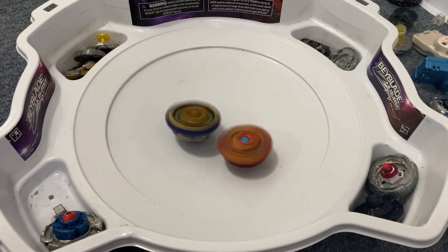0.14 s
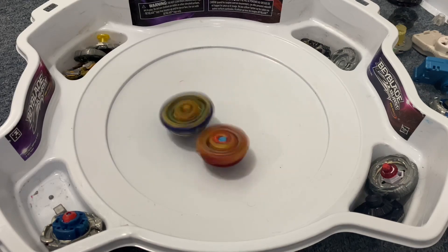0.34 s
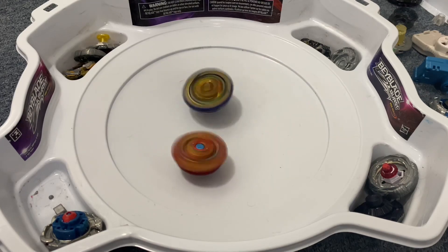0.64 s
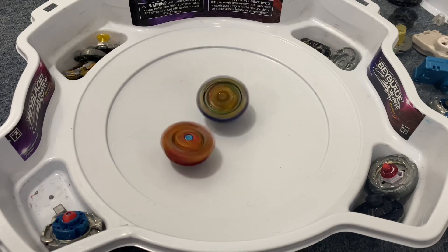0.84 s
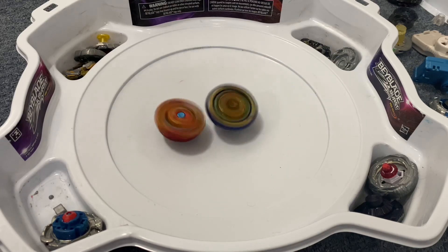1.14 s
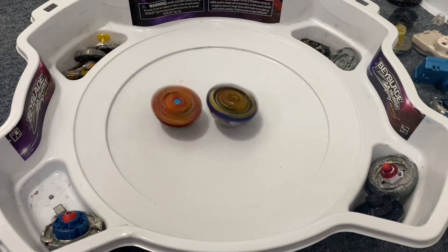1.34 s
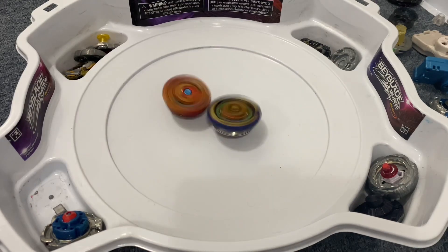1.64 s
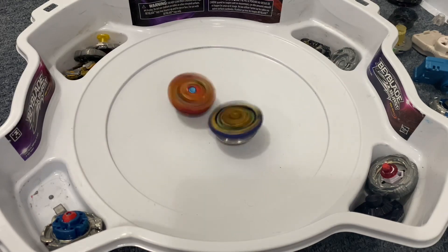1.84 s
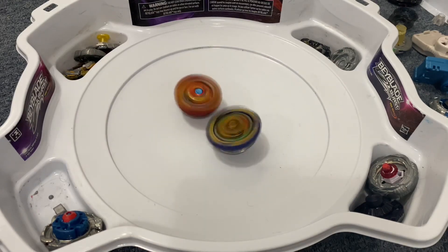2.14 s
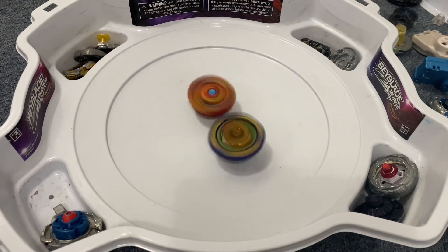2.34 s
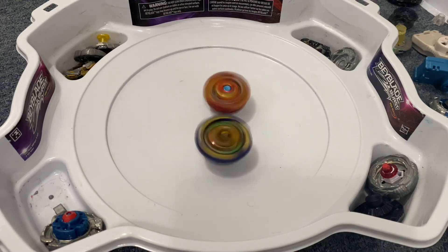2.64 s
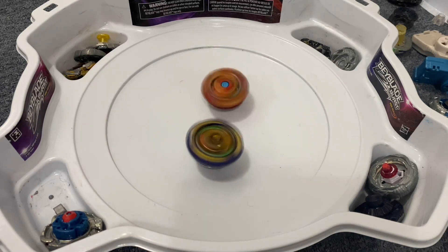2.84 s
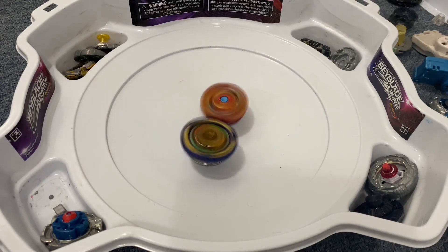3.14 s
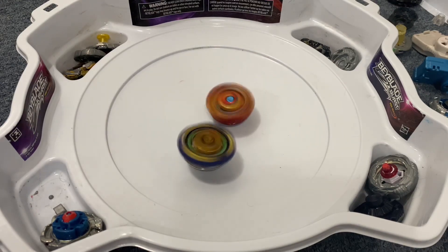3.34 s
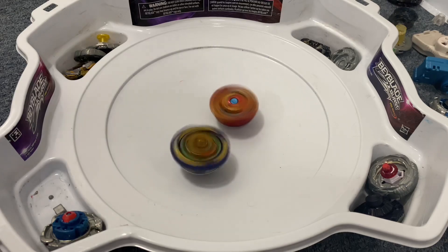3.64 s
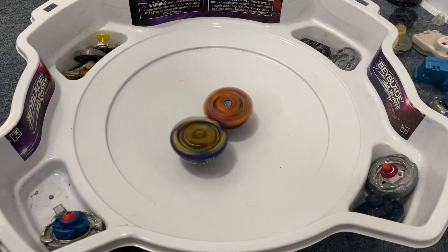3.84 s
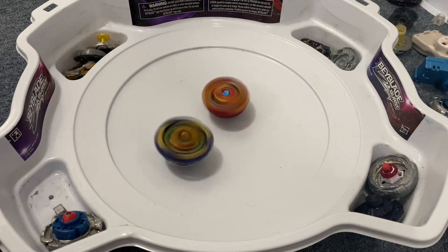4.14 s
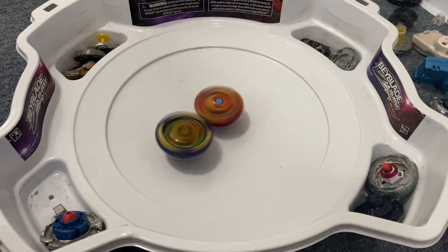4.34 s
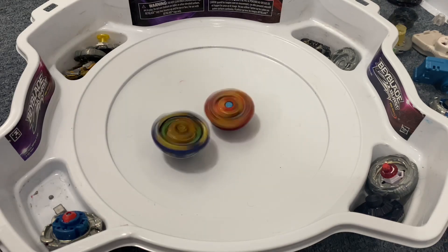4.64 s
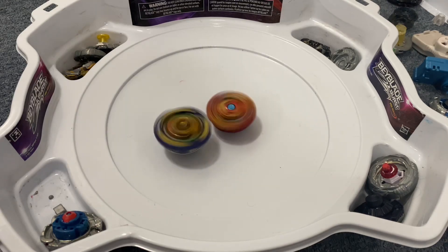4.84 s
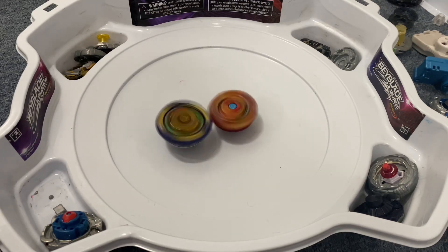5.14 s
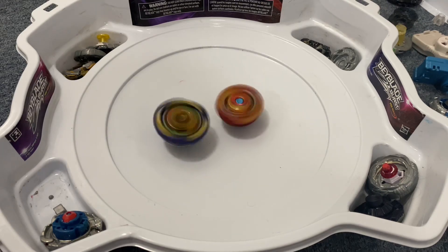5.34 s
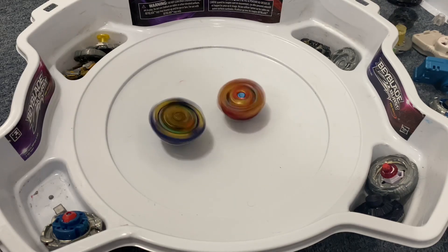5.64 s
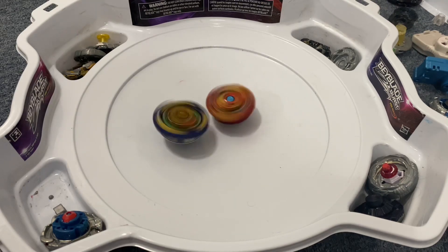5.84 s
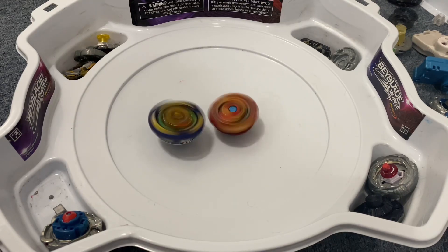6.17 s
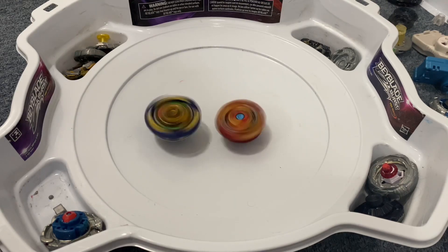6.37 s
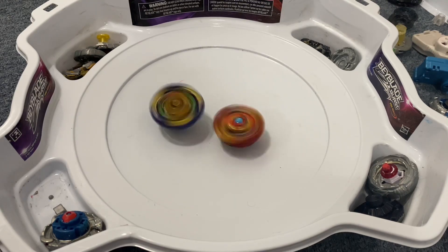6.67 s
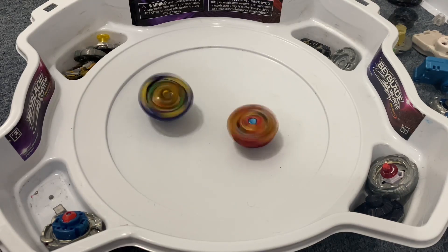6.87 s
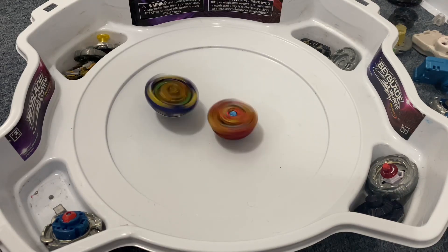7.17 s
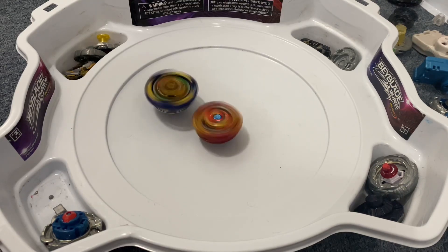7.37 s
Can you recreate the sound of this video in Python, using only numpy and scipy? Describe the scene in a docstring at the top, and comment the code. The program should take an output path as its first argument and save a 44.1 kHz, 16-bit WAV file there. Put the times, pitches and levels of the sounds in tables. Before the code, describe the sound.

Two spinning tops are already circling in a thin plastic bowl, heard close in stereo in a small room. A soft low rumble of the bowl continues throughout, with gritty, pulsing tip scrape clearest in the first 1.5 seconds, then fading. A tight triple clack lands at 0.2 s and a harder one at 0.4, then fast loose ticking, about 36 a second, purrs until 1.25. A clustered crack follows at 1.3, with more at 1.65, 1.9, 2.1, 2.3 and 2.65. Spaced hits come around 3.1, 3.2, 3.6, 3.9, 4.35, 4.45, 4.85, 5.0, 5.2, 5.5, 5.9, 6.3, 6.7 and 7.3. Each is a bright, toothy snap with a hollow plastic knock, thin wavering metallic ring and short rattly echo. Light grazes click between them; ticking returns briefly near 4.7, 5.8 and 6.1, then from 6.9 to 7.3, slightly slower. It ends at 7.5, still spinning.

```python
"""Two spinning tops in a bowl

Two tops circle in a thin plastic bowl and knock rims. Each knock is a burst of teeth on teeth that shakes the
bowl and rings a metal weight ring, whose tones the spin splits in two, along with plastic rims. The tips scrape
as filtered grit, a loose part ticks once a turn, the bowl drums softly as low filtered noise. Two channels
carry it all in a small room, whose echo is noise that dies band by band."""
import sys
import numpy as np
from scipy import signal
from scipy.fft import rfft, irfft, next_fast_len
from scipy.io import wavfile

SR = 44100
rng = np.random.default_rng(int(sys.argv[2]) if len(sys.argv) > 2 else 0)


def wav_record(signal):
    """Record a signal, one row per channel, as 16-bit PCM in the file named by sys.argv[1]."""
    frames = np.transpose(np.atleast_2d(signal))
    bounded = np.clip(frames, -1, 1)
    # unit amplitude maps onto the largest positive 16-bit level
    quanta = np.round(bounded * 32767).astype(np.int16)
    wavfile.write(sys.argv[1], SR, quanta)


N = 331191
T = np.arange(N) / SR

# Rotation of the slowing top: (time [s], turns so far [turns])
TURNS = [(0, .5), (.5308, 20), (.8077, 30), (1.085, 40), (1.2282, 45), (1.552, 56), (1.849, 66),
         (4.5601, 144), (4.7871, 150), (5.709, 174), (5.8707, 178), (6.1336, 184), (6.266, 187),
         (6.9437, 202), (7.2785, 209), (7.52, 214)]
# Tips on the bowl: (time [s], scrape level [dB], drumming level [dB])
TIPS = [(0.0, -51, -41.5), (0.35, -48, -41.5), (0.72, -47.5, -44), (0.85, -51.5, -48), (1.05, -57.5, -47),
        (1.27, -54, -42), (1.4, -49, -46.5), (1.5, -47, -45), (1.84, -60, -47), (2.15, -54.5, -44),
        (2.45, -57.5, -44), (2.84, -56, -46.5), (3.57, -59, -44.5), (3.93, -59.5, -46), (4.85, -63.5, -44),
        (5.04, -71.5, -45), (5.6, -61, -44.5), (6.19, -59, -42), (6.59, -66.5, -43), (6.76, -53, -40.5),
        (6.92, -60.5, -43.5), (7.51, -60, -41.5)]
# Relative spectrum of the scraping grit: (frequency [Hz], level [dB per Hz])
SCRAPE_SPECTRUM = [(180, -16.5), (300, -9), (504, -12.5), (638, -4.5), (877, -1), (1740, -5), (1960, -6.5),
                   (3030, -3.5), (3470, -8), (4390, -6), (7380, -12), (9980, -10), (12200, -18),
                   (14000, -16.5), (16500, -37.5)]
# Relative spectrum of the drumming bowl: (frequency [Hz], level [dB per Hz])
DRUM_SPECTRUM = [(12, -62), (20, -42.5), (32, -30.5), (72, -2), (90, 5.5), (134, -4.5), (173, -8.5),
                 (334, -27.5), (372, -29), (414, -43), (500, -34), (650, -76.5), (1100, -120)]
# Modes of the thin plastic bowl: (frequency [Hz], level [dB], t60 [s])
BOWL_MODES = [(156.1, -4.5, 0.36), (257, -6.5, 0.098), (754, 4.5, 0.041), (882, 3, 0.095),
              (940, 6.5, 0.029), (1160, 7, 0.048), (1360, -2.5, 0.039), (1483, 6.5, 0.021),
              (1855, 2, 0.031), (2010, 8, 0.013), (2350, -8, 0.025), (2920, -29.5, 0.022)]
# Spells in which the loose part rattles: (start [s], end [s], tick level [dB], rebound [dB re tick],
# rebound delay [turns], shell ring [dB re tick], jolt in the bowl [dB re tick], snap [dB re tick])
RATTLES = [(0.0, 0.5, -72, -16, 0.47, -9, -14, 6), (0.55, 0.68, -43.5, -6, 0.33, -14, -27, -1),
           (0.695, 1.266, -46, -23, 0.62, 6.5, -13, -2.5), (1.54, 1.618, -46, -10, 0.63, 8.5, -24, 8),
           (1.805, 1.855, -47, -7, 0.61, 9, -19, -4), (4.565, 4.846, -43, -15, 0.37, -16, -17.5, 1.5),
           (5.633, 5.914, -46, -0.5, 0.36, -19.5, -13.5, -10.5),
           (6.09, 6.2, -45, -2.5, 0.22, -16, -11.5, -2.5), (6.248, 6.27, -44, -6, 0.77, -9, -12, -1),
           (6.89, 7.317, -40, -16, 0.39, -22, -17, -6)]
# The loose part between spells: (tick level [dB], rebound [dB re tick], rebound delay [turns],
# shell ring [dB re tick], jolt in the bowl [dB re tick], snap [dB re tick])
IDLE_TICK = (-77.5, 5, 0, 4.5, -16, 5.5)
# Relative spectrum of the slap: (frequency [Hz], level [dB per Hz])
SLAP_SPECTRUM = [(500, -26), (1000, -16.5), (2500, -28), (3800, 16), (4300, 10), (4900, 2.5), (5700, -2),
                 (6600, 14), (8000, 19), (12000, 9.5), (15000, 1.5), (16500, -26.5)]
# Light grazes of the rims that ring the shell: (time [s], level [dB], slap [dB re level],
# jolt in the bowl [dB re level])
GRAZES = [(0.124, -43, -15, -7), (0.15, -43, -17, -8), (0.1748, -36.5, -14, -12), (0.204, -43, -18, -23),
          (0.313, -44, -16, -6), (0.341, -37.5, -12, -3), (0.367, -28, -11, -17), (0.479, -36, 0, -24),
          (0.531, -43, 3.5, -21), (0.699, -43, 7, -17), (1.453, -37, -4, -13.5), (1.485, -35, 0.5, -10.5),
          (1.516, -34, 0.5, -13), (2.0448, -40.5, -21, -26), (2.0794, -37, -18, -31),
          (2.1695, -25, -11, -28), (2.198, -38, -11, -25), (2.9679, -38, -7, -18), (3.0365, -53, -14, -11),
          (3.749, -42.5, -12, -16), (4.0039, -34.5, -10, -26), (4.095, -43.5, -21, -11.5),
          (4.231, -55, 1, -14), (4.271, -44, -4, -32), (6.208, -45, 4, -7.5), (6.85, -49, 4, -5),
          (7.4, -32.5, -3, -14)]
# Modes of a top's plastic shell, before dulling: (frequency [Hz], level [dB], t60 [s])
SHELL_MODES = [(1400, -9, .014), (1750, -9, .012), (2100, -8, .012), (2550, -4, .016), (2800, -6, .012),
               (3020, -3, .016)]
# Hub that a tick's jolt rings: (frequency [Hz], level [dB re jolt], t60 [s])
HUB = (1100, 7.5, 0.034)
# Knocks: (time [s], level [dB], rake of the teeth [ms], echo [dB re level], bowl thump [dB re level],
# ring tones near 4, 9.5 and 10.2 kHz [dB re level, three columns],
# low body tone [Hz], its level [dB re level], high body tone [Hz], its level [dB re level],
# skid [dB re level])
KNOCKS = [(0.2167, -11, 2.6, -10, -16.5, -39, -42, -23, 1118, -19, 1510, -23, -33.5),
          (0.2238, -18, 4, -12, -19, -36, -42, -30, 1110, -22, 1900, -28, -40),
          (0.2367, -11.5, 3.4, -12.5, -21, -38, -46, -31, 1290, -24, 2160, -16, -37),
          (0.38, -6, 3.8, -9, -18, -32.5, -25, -19.5, 872, -24, 2540, -16, -33.5),
          (1.262, -31.5, 2.4, -10, -2.5, -14, -13.5, -28, 840, -13, 1440, -20, -22),
          (1.3267, -12.5, 2.8, -11, -16.5, -33, -29, -21, 1029, -12, 2650, -12, -38),
          (1.3401, -24, 5.5, -2.5, -5, -29, -22, -24, 960, -31, 1740, -20, -34),
          (1.3544, -7, 3.8, -16.5, -29, -34, -25, -22, 710, -21.5, 1900, -34, -54),
          (1.638, -21, 3.4, -14, -28, -37, -41, -28, 1384, -15, 2300, -10, -43),
          (1.696, -14, 3.6, -16.5, -29, -33.5, -47, -27, 1360.0, -23, 2210, -20, -50),
          (1.8643, -6.5, 3.8, -15.5, -25, -20.5, -18.5, -10, 892, -35, 1840, -16, -47),
          (2.1034, -22, 2.5, -16, -22, -40, -40, -34, 960, -28, 1890, -10, -42),
          (2.1084, -6.5, 1.9, -16, -28, -37, -34.5, -20.5, 980, -38, 1926, -14.5, -44.5),
          (2.2692, -11, 2.2, -16.5, -20.5, -33, -47, -36, 986, -11.5, 1800, -13.5, -39),
          (2.3328, -26, 2.6, -10, -7, -40, -38, -42, 795, -29, 1500, -1, -45),
          (2.3411, -8.5, 3.5, -11, -19, -32, -29.5, -29, 957, -12, 2130, -12, -40),
          (2.652, -9, 3.6, -9, -16, -26, -26, -20, 1095, -12.5, 2620.0, -26, -34.5),
          (3.0989, -17, 4.1, -11, -18.5, -41, -44, -25.5, 860, -38, 1925, -9.5, -59),
          (3.1098, -25.5, 5, -17, -15, -38, -40, -30, 1130, -16, 1970, -1, -52),
          (3.2014, -13, 3.4, -12, -19, -44, -29, -23.5, 1270, -18, 1925, -10, -38),
          (3.5921, -8, 5.1, -14, -19.5, -38, -37, -15, 1300, -21, 1520, -14.5, -51),
          (3.8976, -6, 4.4, -11, -20, -28.5, -30, -17, 1260, -12.5, 2080.0, -35.5, -38),
          (4.3387, -14, 3.9, -10.5, -15.5, -44, -32, -32, 1030.0, -22, 1410, -11.5, -40),
          (4.4316, -11, 4.5, -12.5, -20.5, -51, -41, -25, 874, -12, 1693, -12, -49),
          (4.8435, -13.5, 4.1, -14, -20.5, -38.5, -31, -18.5, 1175, -26, 1400, -15, -36.5),
          (4.9685, -26.5, 6.4, -8.5, -9.5, -44, -39, -37, 1050, -16, 1446, -6, -38),
          (5.0299, -8.5, 4, -18.5, -25.5, -39, -46.5, -19, 1170, -23.5, 2170, -30, -54),
          (5.188, -27, 3.3, -9.5, -14, -28, -34, -32, 1348, -10, 1650, -5, -33),
          (5.2106, -6.5, 3.8, -15, -24, -41, -45, -24, 1150, -25, 1960.0, -18, -41),
          (5.5162, -5, 4.7, -13, -21, -39.5, -23, -21, 1186, -16.5, 1496, -16.5, -41),
          (5.9095, -31, 5.4, -9, -0.5, -29.5, -22, -24, 1490, -5, 2640.0, -2, -35),
          (5.918, -6, 6.8, -13, -18, -32.5, -19, -6, 1304, -18, 2450, -40, -39),
          (6.2796, -5.5, 4.3, -15, -23.5, -44, -34.5, -23.5, 989, -25, 1510, -22, -40.5),
          (6.6964, -7, 6, -9.5, -23, -25.5, -11, -10.5, 930, -22.5, 2450.0, -21, -34),
          (7.3272, -9.5, 5.9, -10.5, -24, -41, -29, -25, 680, -29, 2140, -18, -34)]
# Relative spectrum of teeth on teeth: (frequency [Hz], level [dB per Hz])
CRACK_SPECTRUM = [(240, -32.5), (400, -32), (2400, -2), (3070, 8), (5550, -9.5), (7940, 0), (10000, 3),
                  (11400, 4), (14100, -4.5), (15300, -5.5), (16500, -36.5)]
# Modes of the metal weight ring: (frequency [Hz], level [dB], t60 [s], waves round the ring [count],
# group of tones [0-2], lean to the upper split tone [-1 to 1])
METAL_MODES = [(3945, 1, .28, 1, 0, .3), (3915, 1, .3, 0, 0, 0), (4010, 1, .14, 1, 0, -.3),
               (3720, -8, .14, 1, 0, .3), (3040, -3, .15, 1, 0, .3), (4990, -8, .12, 1, 0, .3),
               (9520, 0, .31, 3, 1, -.45), (9520, -15, .26, 0, 1, 0), (10165, 0, .18, 3, 2, .2),
               (10250, -8, .17, 0, 2, 0), (9990, -12, .15, 1, 2, .3), (6500, -24, .14, 1, 2, .3),
               (8700, -14, .1, 2, 2, .3), (13500, -14, .09, 2, 2, .3)]
# Modes of the plastic rims: (frequency [Hz], level [dB], t60 [s])
RIM_MODES = [(1690, -5, .09), (2090, -3, .09), (2620, -4, .1), (3140, -4, .1), (3480, -3, .09),
             (4400, -4, .09), (5050, -4, .09), (5670, -6, .08), (6250, -6, .07), (6760, -5, .08),
             (7860, -13, .05)]
# Relative spectrum of the echo: (frequency [Hz], level [dB per Hz])
ECHO_SPECTRUM = [(200, 3), (500, -16.5), (900, 1), (1500, 1.5), (3000, -3.5), (6000, -2.5), (10000, -1),
                 (13000, -14.5), (16500, -8)]
# Decay of the room's late tail: (frequency [Hz], t60 [s])
ROOM_T60 = [(200, 0.31), (530, 0.33), (1400, 0.24), (3700, 0.31), (9700, 0.19), (15000, 0.011)]
# Colour of the channels: (frequency [Hz], left minus right [dB])
LEFT_BIAS = [(100, -.5), (300, 0), (800, 4), (1500, 1.5), (2750, 0), (3600, 3.5), (4500, 1), (5500, 2.5),
             (8500, 1.5), (10000, -.8), (16000, -.5)]

# The scrape is duller as the spin runs down; its hiss swings less than its body
SCRAPE_BRIGHT_DB, SCRAPE_DULLS_DB_PER_S, BRIGHT_PER_SCRAPE_DB = -6, 0.5, -0.34
REFERENCE_SCRAPE_DB = -55
# The tip digs in once a turn and eases off; less so as the top settles
THROB_EXTRA_DB, THROB_LATE_DB, THROB_FADE_S = 11, 7, 1.2
DRUM_BRIGHT_DB, DRUM_BRIGHT_PER_SCRAPE_DB = 3.5, 0.85  # a hard scrape drums higher
RATTLE_SWELL_S, RATTLE_FADE_S = 0.053, 0.043  # a spell swells before its start and dies after its end
GRAZE_SHELL_DB = -4.5  # re graze level
SHELL_RUB_S, SHELL_TOP_HZ = .0012, 3400  # a touch is a short rub; the shell sends out little above
# Per octave: the ring sinks as the top leans, from 1 s to SHELL_DULLEST_S; its tones waver by chance
SHELL_DULLS_DB_PER_S, SHELL_DULLEST_S, SHELL_CHANCE_DB = 6, 2.1, 1.5
SNAP_HZ = (3600, 6400)  # part of the slap that sounds in both channels at once
BODY_LOW_T60_S, BODY_HIGH_T60_S = .055, .04
SKID_PER_S, SKID_FADE_S, SKID_IN_BOWL_DB = 220, 0.037, -15.5  # the tip hops after a knock
RING_ROUGH_DB = 2.5  # loose fit makes the low ring tones waver
RIM_DB, RIM_CHANCE_DB = -19, 6  # re echo; each knock favours other tones
# The first echoes die sooner (share of the room's t60), a weaker tail lingers
EARLY_SHARE, LATE_DB = 0.55, -8
BASS_LAG, TREBLE_LEAD, SPLIT_HZ = 6.5, 11.06, 6500  # right channel against left, in samples


def from_db(db):
    """Logarithmic level: 20 dB is a factor of ten in amplitude."""
    return np.exp(np.asarray(db) * (np.log(10) / 20))


def rms_one(x):
    """Normalisation: equal mean power, rms 1."""
    return x / np.sqrt(np.mean(x ** 2) + 1e-20)


def in_time(rows):
    """Linear interpolation: the columns of a time table at every sample."""
    s, *columns = np.transpose(rows)
    return [np.interp(T, s, c) for c in columns]


def at_hz(points, hz):
    """Logarithmic pitch: a spectrum table is read on a log frequency axis."""
    points_hz, values = np.array(points).T
    return np.interp(np.log(hz + 1), np.log(points_hz), values)


def filtered(x, order, hz, kind):
    """Butterworth filtering: a maximally flat passband, applied causally."""
    return signal.sosfilt(signal.butter(order, hz, kind, fs=SR, output="sos"), x)


def colour(x, spectrum):
    """Minimum phase: folding the cepstrum makes a causal filter of the given spectrum, with unit energy."""
    size = 2 ** 14
    cepstrum = irfft(np.log(from_db(at_hz(spectrum, np.fft.rfftfreq(size, 1 / SR)))))
    cepstrum[1:size // 2] *= 2
    cepstrum[size // 2 + 1:] = 0
    response = irfft(np.exp(rfft(cepstrum)))[:size // 2]
    return signal.fftconvolve(x, response / np.linalg.norm(response))[:N]


def drift(rate):
    """Slow random modulation: independent normal values, 2 * rate a second, joined by straight lines."""
    steps = T * rate * 2
    count = int(steps[-1]) + 2
    return np.interp(steps, np.arange(count), rng.standard_normal(count))


def ring(clicks, hz, t60):
    """Damped resonance: a unit click sets a decaying sine of initial height 1 ringing."""
    r, w = from_db(-60 / (t60 * SR)), 2 * np.pi * hz / SR
    return signal.lfilter([0, np.sin(w)], [1, -2 * r * np.cos(w), r * r], clicks + 1e-18)


def smear(x, fade_s, gain=1):
    """Exponential relaxation: each click becomes a decaying envelope."""
    return signal.lfilter([gain], [1, -np.exp(-1 / (fade_s * SR))], x)


def bowl(force):
    """Modal superposition: the thin plastic bowl rings in its modes, of alternating sign."""
    return sum((-1) ** k * from_db(db) * ring(force, hz, t60) for k, (hz, db, t60) in enumerate(BOWL_MODES))


def scrape(turns, level_db, bright_db, bowl_db):
    """Friction noise: dense grit under a tip throbs with each turn, heard directly and through the bowl."""
    grit = rng.standard_normal(N) * from_db(2.8 * np.minimum(rng.exponential(1, N), 5))
    throb_db = THROB_LATE_DB + THROB_EXTRA_DB * np.exp(-T / THROB_FADE_S)
    grit = grit * from_db(throb_db * (.5 - turns % 1) + 2.8 * drift(55) + 2.5 * drift(5.6))
    above_boom = filtered(bowl(grit), 2, 600, "high")
    direct = rms_one(colour(grit, SCRAPE_SPECTRUM))
    both = rms_one(direct + from_db(bowl_db) * rms_one(above_boom))
    high = filtered(both, 2, 2000, "high")
    return from_db(level_db) * (both + (from_db(bright_db) - 1) * high)


def drumming(level_db, bright_db, apart_db):
    """Forced vibration: the bowl drums on the floor as low noise, nearly alike in both channels."""
    mid, side = (rms_one(colour(rng.standard_normal(N) * from_db(0.84 * drift(10.0)), DRUM_SPECTRUM))
                 for _ in range(2))
    both = mid + from_db(apart_db) * side * [[1], [-1]]
    high = filtered(both, 3, 125, "high")
    return from_db(level_db) * (both - high + from_db(bright_db) * high)


def rattle_controls():
    """Linear cross-fading: the six tick settings glide from idle to each spell's values and back."""
    idle, change = np.array(IDLE_TICK)[:, None], 0
    shares = [np.interp(T, [start - RATTLE_SWELL_S, start, end, end + RATTLE_FADE_S], [0, 1, 1, 0])
              for start, end, *_ in RATTLES]
    for share, (_, _, *values) in zip(shares, RATTLES):
        change = change + share * (np.array(values)[:, None] - idle)
    return idle + change / np.maximum(sum(shares), 1)


def loose_part_hits(turns, rebound_db, late):
    """Periodic impact: the loose part hits once a turn and rebounds; strengths relative to the main tick."""
    hits = np.zeros(N)
    rebound_phase = turns - late + 0.067 * drift(8.4)
    for level_db, phase in (0, turns), (rebound_db, rebound_phase):
        new_turn = np.diff(np.floor(phase), prepend=0) > 0
        hits += new_turn * from_db(level_db + 1.5 * rng.standard_normal(N))
    return hits


def shell_ring(touches):
    """Modal resonance: short rubs and clicks ring the plastic shell, which dulls as the top leans."""
    rub = rng.standard_normal(N) * smear(touches, SHELL_RUB_S, gain=.12)
    force = rub + .8 * touches
    dull_db = SHELL_DULLS_DB_PER_S * (1 - np.clip(T, 1, SHELL_DULLEST_S))
    shell = 0
    for k, (hz, db, t60) in enumerate(SHELL_MODES):
        tone_db = db + dull_db * np.log2(hz / 2500) + SHELL_CHANCE_DB * drift(30)
        shell = shell + (-1) ** k * ring(force * from_db(tone_db), hz, t60)
    return filtered(shell, 5, SHELL_TOP_HZ, "low")


def ticks_and_grazes(turns):
    """Impact excitation: ticks and grazes give a slap, a ring alike in both channels and a jolt to the bowl."""
    tick_db, rebound_db, late, shell_db, jolt_db, snap_db = rattle_controls()
    hits = loose_part_hits(turns, rebound_db, late)
    s, db, slap_db, graze_jolt_db = np.transpose(GRAZES)
    grazes, graze_slaps, graze_jolts = touches = np.zeros((3, N))
    touches[:, np.round(s * SR).astype(int)] = from_db([db, db + slap_db, db + graze_jolt_db])
    slap = rng.standard_normal(N) * smear(hits * from_db(tick_db) + graze_slaps, 0.0017)
    slap = colour(slap, SLAP_SPECTRUM)
    shell = shell_ring(hits * from_db(tick_db + shell_db) + grazes * from_db(GRAZE_SHELL_DB))
    snap = from_db(snap_db) * filtered(slap, 2, SNAP_HZ, "band")
    jolt = hits * from_db(tick_db + jolt_db)
    hub_hz, hub_db, hub_t60 = HUB
    hub = ring(jolt * from_db(hub_db), hub_hz, hub_t60)
    return slap, shell + snap + hub, jolt + graze_jolts


def body(db, low_hz, low_db, high_hz, high_db, skid_db, chance):
    """Contact position: where the rims meet sets two plastic tones; the hopping tip keeps the low one rattling."""
    span = np.arange(chance.shape[1]) / SR
    hops = (chance[0] < SKID_PER_S / SR) * (2 * chance[1] - 1) * 2 * from_db(db + skid_db)
    hops = hops * np.minimum(span / 0.011, 1) * np.exp(1.2 - span / SKID_FADE_S)
    blow = (span == span[40]) * from_db(db)
    low = ring(blow * from_db(low_db) + hops, low_hz, BODY_LOW_T60_S)
    high = ring(blow * from_db(high_db), high_hz, BODY_HIGH_T60_S)
    return low + high, hops * from_db(SKID_IN_BOWL_DB)


def whirl(clicks, hz, t60):
    """Complex resonance: a ringing mode as a decaying, turning wave."""
    pole = from_db(-60 / (t60 * SR)) * np.exp(2j * np.pi * hz / SR)
    return signal.lfilter([0, 1], [1, -pole], clicks + 1e-18)


def metal_ring(turns):
    """Rotational splitting: the standing wave turns with the ring, so its lobes sweep past the listener."""
    table, metal, waver = np.array(KNOCKS), 0, from_db(RING_ROUGH_DB * drift(45))
    at = np.round(table[:, 0] * SR).astype(int) + 40
    for hz, db, t60, waves, group, lean in METAL_MODES:
        clicks = np.zeros(N)
        clicks[at] = from_db(table[:, 1] + table[:, 5 + group] + db + rng.normal(0, 2.55, len(at)))
        angle = 2 * np.pi * waves * (turns + rng.random())
        wave = whirl(clicks, hz, t60)
        tone = wave.imag * np.cos(angle) + lean * wave.real * np.sin(angle)
        metal = metal + tone * (waver if group == 0 else 1)
    return metal


def knocks(turns):
    """Impact of toothed rims: crack, body and metal ring, push on the bowl and strengths fed to the echo."""
    teeth, thump, sent, low_sent, plastic = np.zeros((5, N))
    span = np.arange(int(0.022 * SR)) / SR
    for s, db, rake_ms, echo_db, bowl_db, _, _, _, *tones in KNOCKS:
        start = round(s * SR)
        at = slice(start, start + len(span))
        # teeth rake past, then part
        approach = np.minimum(span * 1000 / (0.38 * rake_ms), 1) ** 2
        contact = approach * np.exp(-(span * 1000 / rake_ms) ** 2)
        grit = rng.standard_normal(len(span)) * from_db(2.0 * rng.standard_normal(len(span)))
        burst = grit * contact
        burst *= np.linalg.norm(contact) / np.linalg.norm(burst) * from_db(db)
        teeth[at] += burst
        chance = rng.random((2, SR // 4))[:, :N - start]
        tail = slice(start, start + chance.shape[1])
        rung, hops = body(db, *tones, chance)
        plastic[tail] += rung
        thump[tail] += hops
        thump[at] += burst * from_db(bowl_db - 41.0)
        thump[start + 60] += from_db(db + bowl_db - 15.0)  # the blow itself
        low_sent[start] = from_db(db + bowl_db + 7.5)
        sent[start] = from_db(db + echo_db)
    return colour(teeth, CRACK_SPECTRUM) + metal_ring(turns) + plastic, thump, sent, low_sent


def rims(strength):
    """Modal decay: the plastic rims ring on after a knock, each tone wavering as the tops turn."""
    rung = 0
    for hz, db, t60 in RIM_MODES:
        clicks = strength * from_db(RIM_DB + db + RIM_CHANCE_DB * drift(12))
        rung = rung + ring(clicks, hz, t60) * from_db(3.7 * drift(70))
    return rung


def echo(strength, low_strength, rattle_db, lumpy_db, flutter_db):
    """Diffuse decay: bowl, walls and uneven loose parts as noise dying by band, alike in both channels in the
    bass."""
    out, white = np.zeros((2, N)), rng.standard_normal((2, 2, N)) * from_db(rattle_db * drift(90))
    for k, low in enumerate(150 * 2 ** np.arange(0, 6.8, .4)):
        source = low_strength if low < 1600 else strength
        fed = source * from_db(lumpy_db * drift(12))  # each knock has its own colour
        keep = from_db(-120 / SR / at_hz(ROOM_T60, low * 1.04))  # power kept per sample
        swell = signal.lfilter([.015], [1, -.985], fed ** 2 + 1e-18)  # swells, then dies
        early = signal.lfilter([1], [1, -keep ** (1 / EARLY_SHARE)], swell)
        late = from_db(2 * LATE_DB) * signal.lfilter([1], [1, -keep], swell)
        noise = white[k % 2] if low > 250 else white[k % 2, 0]
        noise = filtered(noise, 2, [low, low * 2 ** (2 / 5)], "band")
        level = from_db(at_hz(ECHO_SPECTRUM, low * 1.24) + flutter_db * drift(60))
        out = out + noise * (level * np.sqrt(early + late))
    return out


def through(x, response):
    """Linear filtering: a complex response of frequency multiplies the spectrum."""
    size = next_fast_len(N + 2000)
    return irfft(rfft(x, size) * response(np.fft.rfftfreq(size, 1 / SR)), size)[..., :N]


def right_channel(hz):
    """Phase shift between channels: the right channel has the bass later, and the treble earlier and inverted."""
    treble = 1 / (1 + (SPLIT_HZ / (hz + 1)) ** 12)
    turn = -2j * np.pi * hz / SR
    return (1 - treble) * np.exp(turn * BASS_LAG) - treble * np.exp(-turn * TREBLE_LEAD)


def channels(x):
    """Stereo pair: one near sound in both channels, the right one shifted in phase."""
    return np.array([x, through(x, right_channel)])


def scene():
    """Superposition: tops, bowl and room add linearly."""
    turns, = in_time(TURNS)
    scrape_db, drum_db = in_time(TIPS)
    harder_db = scrape_db - REFERENCE_SCRAPE_DB
    bright_db = SCRAPE_BRIGHT_DB - SCRAPE_DULLS_DB_PER_S * T + BRIGHT_PER_SCRAPE_DB * harder_db
    drum_bright_db = DRUM_BRIGHT_DB + DRUM_BRIGHT_PER_SCRAPE_DB * harder_db
    # one top spins a little slower
    first_tip = scrape(turns * 0.91, scrape_db + 2.0, bright_db, bowl_db=-31.0)
    second_tip = scrape(turns, scrape_db - 0.5, bright_db, bowl_db=-3.0)
    drum = drumming(drum_db, drum_bright_db, apart_db=-11.5)
    slap, shell, jolt = ticks_and_grazes(turns)
    clack, thump, sent, low_sent = knocks(turns)
    near = channels(clack + slap + bowl(thump + jolt) + first_tip)
    near = near + shell + rims(sent) + second_tip * from_db([[1.5], [-1.5]])
    tails = echo(sent, low_sent, rattle_db=1.5, lumpy_db=2.2, flutter_db=2.8)
    return near + tails + drum


def record(dry):
    """Transducer response: the channels differ in colour, peaks are rounded, the top is cut at 16.9 kHz."""
    biased = through(dry, lambda hz: from_db(at_hz(LEFT_BIAS, hz) * np.array([[.5], [-.5]])))
    rounded = .82 * np.tanh(biased / .82)
    return signal.sosfilt(signal.cheby2(14, 70, 16900, fs=SR, output="sos"), rounded)


dry = scene()
out = record(dry)
wav_record(out)
```